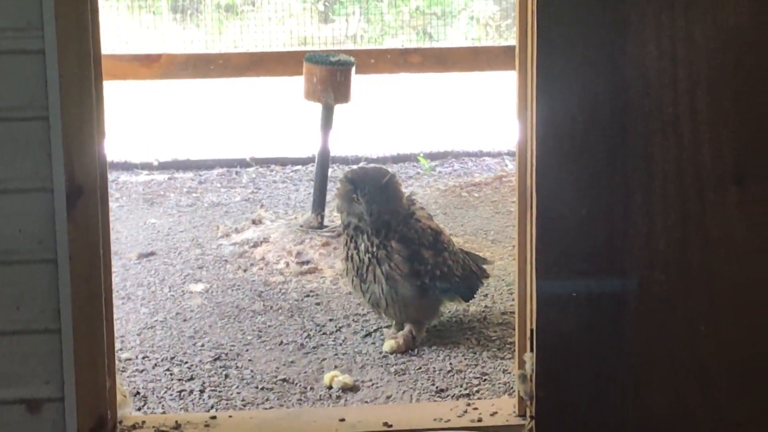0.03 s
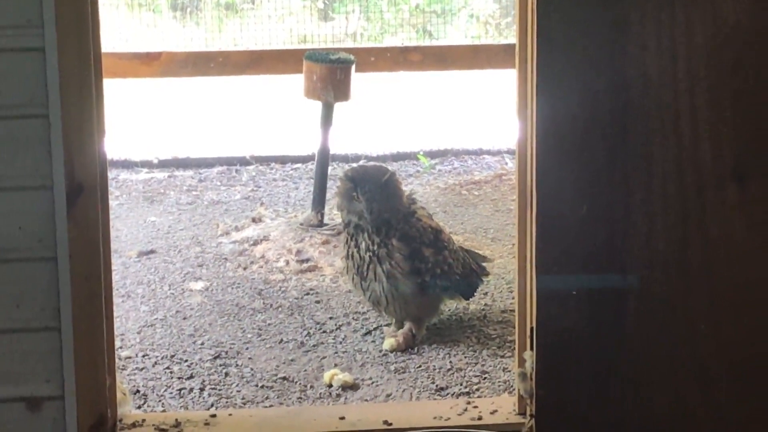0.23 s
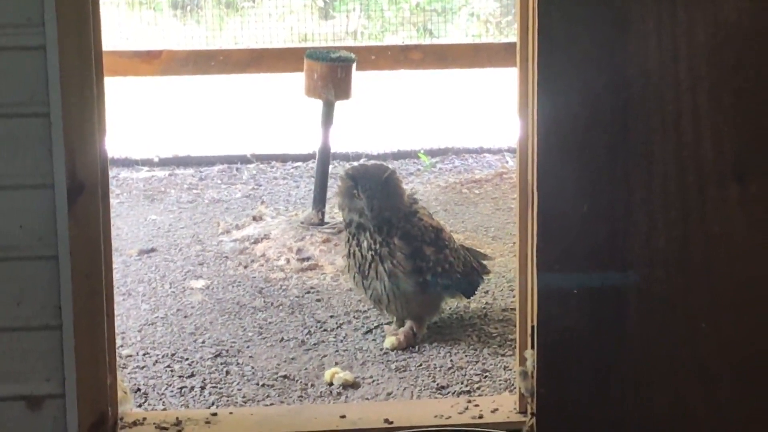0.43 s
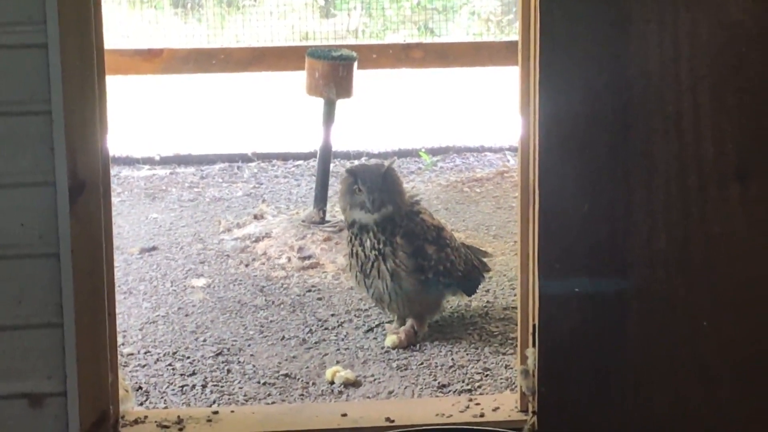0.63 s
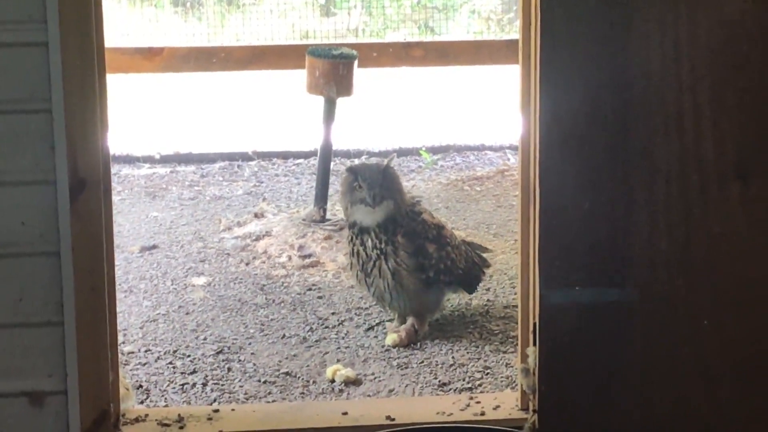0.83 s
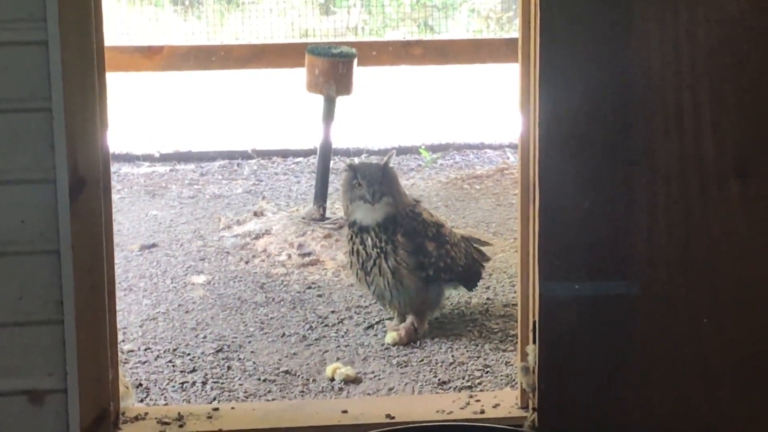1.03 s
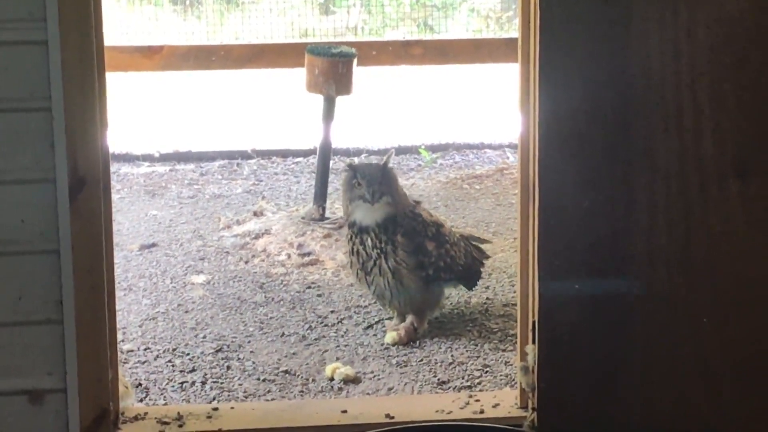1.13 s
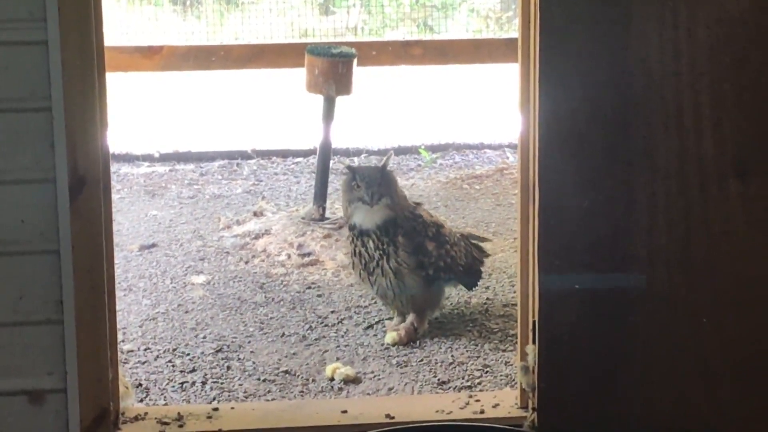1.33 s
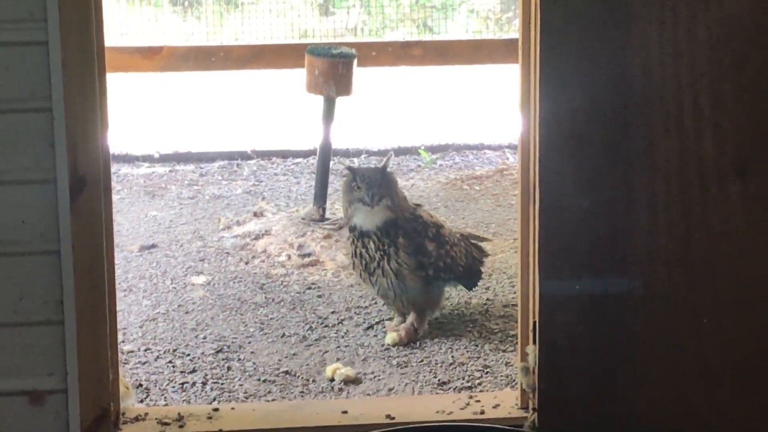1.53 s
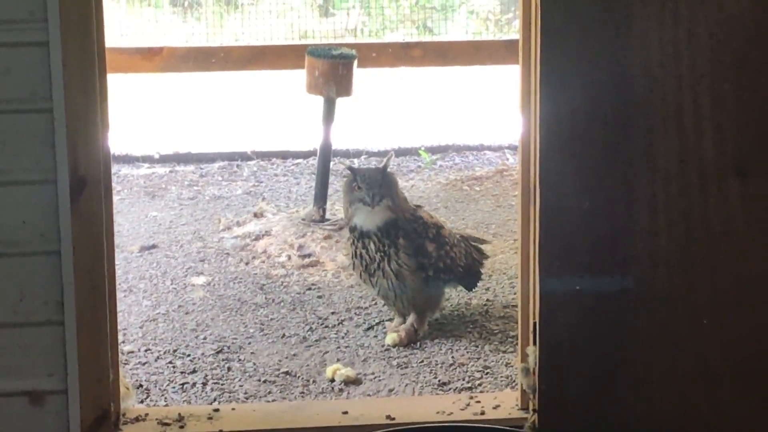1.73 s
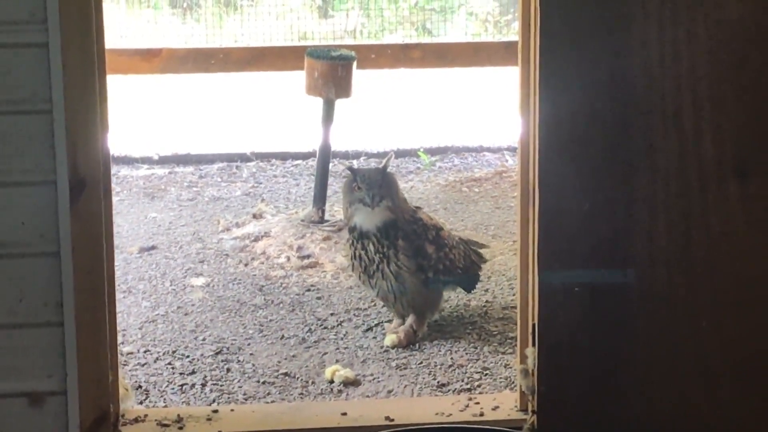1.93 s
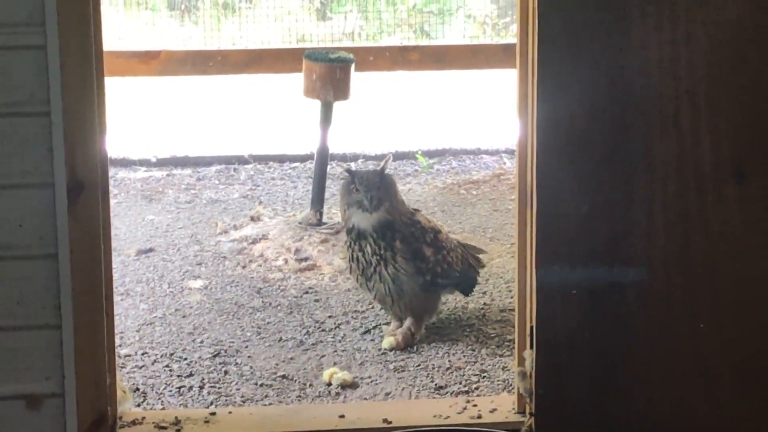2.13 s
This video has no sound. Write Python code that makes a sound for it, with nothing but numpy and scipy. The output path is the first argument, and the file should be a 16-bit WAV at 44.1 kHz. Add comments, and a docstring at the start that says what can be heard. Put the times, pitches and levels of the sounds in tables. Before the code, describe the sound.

A large owl gives one deep, hollow hoot that sags in pitch inside a wooden barn

```python
"""A motor hums over air and microphone hiss: wavering sine lines on coloured noise.
Small birds twitter far outside, early on and again around the hoot: short gliding whistles.
An eagle owl hoots once from the doorway of a wooden barn: clean partials on a pitch that jumps up and sags,
then breaks into a breathy creak. Echoes swell and thin the partials as the pitch slides through them."""
import sys
import numpy as np
from scipy import signal
from scipy.fft import rfft, irfft
from scipy.io import wavfile
from scipy.ndimage import uniform_filter1d

SR = 44100
rng = np.random.default_rng(int(sys.argv[2]) if len(sys.argv) > 2 else 0)


def store_wav(level_fs):
    """Save 16-bit WAV to argv[1]."""
    pcm = np.round(np.clip(np.atleast_2d(level_fs), -1, 1) * 32767)
    wavfile.write(sys.argv[1], SR, pcm.T.astype(np.int16))


def gain_from_db(level_db):
    """Convert decibel levels to linear amplitude factors (20 dB per decade)."""
    decades = np.asarray(level_db, float) / 20
    return 10 ** decades


N = 95564

# motor hum lines: f/Hz, mean level/dB rms
HUM_LINES = [(59.2, -63), (118.4, -78.5), (177.6, -73)]
HUM_WAVER_DB, HUM_WAVER_HZ = 0.73, 2.8

# spectrum of air and hiss: f/Hz, relative density/dB
FLOOR_SPECTRUM = [(25, -27), (42, 0.5), (75, 2), (100, -7), (140, -5.5), (300, -5.5), (700, -8.5),
                  (1000, -13), (2000, -18), (3500, -17.5), (5000, -21.5), (6500, -22.5), (7600, -28.5),
                  (9000, -27), (10500, -31.5), (11500, -28), (15600, -30)]
FLOOR_DB, PATCH_DB = -66, 1.38
SWELL_DB, SWELL_HZ = -0.06, 4.7

# far bird notes: start t/s, length t/s, start f/Hz, end f/Hz, level before flutter/dB
BIRD_NOTES = [(.275, 0.056, 2950, 3005, -78.5), (.315, 0.035, 3650, 3400, -88),
              (.335, .025, 2940, 3330, -75), (.365, .03, 3720, 3750, -82), (.37, 0.027, 2780, 2500, -81),
              (.395, 0.052, 3850, 3910, -83), (.455, 0.027, 3860, 3860, -84), (.51, .03, 3900, 4080, -85),
              (1.285, 0.045, 5740, 6230, -83.5), (1.635, 0.048, 3150, 3210, -79),
              (1.675, 0.029, 3807, 4040, -77), (1.70, 0.066, 4302, 4280, -78.5),
              (1.70, 0.09, 3246, 3236, -76), (1.775, 0.022, 2580, 2500, -75.5),
              (1.785, 0.029, 2993, 3220, -72), (1.83, 0.049, 3330, 2990, -77),
              (1.835, 0.04, 2500, 2853, -81), (1.86, .045, 3300, 3530, -78.5),
              (1.875, .03, 3020, 2694, -81), (1.95, 0.024, 3180, 3145, -85)]
# bursts of quick chirps: start t/s, length t/s, lowest start f/Hz, highest start f/Hz, level before flutter/dB
CHATTER_BURSTS = [(0.332, .15, 2633, 3686, -85.5), (1.768, .14, 2500, 3686, -85)]
CHIRPS_PER_BURST, CHIRP_S, CHIRP_GLIDE = 28, 0.014, 0.15  # glide: largest fraction of start pitch
FLUTTER, FLUTTER_HZ = 0.6, 110  # flutter: rms fraction of amplitude
WOODS_DB, WOODS_T60_S = -1, 0.4

# the hoot: t/s, pitch f/Hz, effort level/dB
HOOT_CURVE = [(1.2, 241.3, -78.5), (1.226, 266.5, -56.5), (1.245, 291.3, -43.5), (1.263, 312.5, -45),
              (1.284, 323.7, -35), (1.304, 333.2, -55), (1.33, 319.6, -40.5), (1.369, 300.1, -36),
              (1.42, 299.3, -43), (1.47, 288.7, -43.5), (1.519, 266.2, -44), (1.58, 261.9, -44.5),
              (1.649, 242, -53), (1.719, 234.7, -51.5), (1.78, 217.8, -53.5), (1.82, 201.3, -57),
              (1.848, 181, -73)]
# partials of the syrinx: multiple of pitch, level re effort/dB
SYRINX_PARTIALS = [(1, 1), (2, -7), (3, -11), (4, -9), (5, -11), (6, -22), (7, -26.5), (8, -27.5)]
# swollen throat's colour on the tone: f/Hz, gain/dB
SAC_GAIN = [(200, 4), (300, -4.5), (450, 3.5), (600, 11), (750, -6), (900, -12), (970, -16), (1150, -24),
            (1600, -18.5), (2400, -22)]
JITTER, JITTER_HZ = 0.001, 40  # jitter: rms fraction of pitch
# fast wavering of partial strength (rms fraction), worst as the tone starts
SHIMMER, ONSET_SHIMMER, SHIMMER_HZ, SETTLE_S = 0.04, 0.55, 80, 0.05
AIR_DB = -38  # breath riding on the tone, re effort
# extra puffs of breath: start t/s, length t/s, level/dB
BREATH_PUFFS = [(1.218, 0.041, -58.5), (1.835, .11, -60.5)]
# colour of breath in the throat: f/Hz, relative density/dB
THROAT_SPECTRUM = [(59, -30), (100, -5.5), (304, -6), (356, 0.5), (422, -3), (1040, -20.5), (1290, -41),
                   (1500, -30.5), (1950, -68.5), (3300, -120)]
# closing creak: start t/s, length t/s, start f/Hz, end f/Hz, level/dB
CREAK_GLIDE = (1.855, .105, 148, 136, -62)
CREAK_JITTER, CREAK_JITTER_HZ = 0.03, 70  # jitter: rms fraction of pitch
CREAK_PARTIALS, CREAK_TILT = 5, 0.5  # partial k has amplitude k ** -tilt

# echoes from floor, door frame and walls: delay t/ms, level/dB, sign
BARN_ECHOES = [(2.6, -14.5, 1), (5.105, -14, -1), (6.93, -16.5, 1), (9.69, -11.5, 1), (12.47, -8, 1),
               (14.54, -22.5, -1), (17.88, -14, 1), (19.585, -7.5, 1), (24.92, -16.5, -1), (26.826, -10, 1),
               (29.13, -23.5, -1), (31.435, -15, -1), (33.61, -13, 1), (35.92, -17.5, 1), (37.69, -16, -1),
               (43.7, -21.5, 1), (67.66, -15, 1), (95.33, -13, 1)]
DIRECT_DB = 0.5
TAIL_DB, TAIL_T60_S, TAIL_TOP_HZ = -6.5, 0.61, 2500


def evened(x):
    """Scales to rms 1."""
    return x / np.sqrt(np.mean(x ** 2) + 1e-20)


def add(mix, start_s, sound):
    """Mixes a sound in at a time, cut at the end of the mix."""
    part = mix[round(start_s * SR):][:len(sound)]
    part += sound[:len(part)]


def coloured(spectrum):
    """Noise of rms 1 with a spectrum interpolated on a log-frequency axis."""
    hz = np.fft.rfftfreq(N, 1 / SR)
    point_hz, point_db = np.transpose(spectrum)
    gain = gain_from_db(np.interp(np.log(hz + 1), np.log(point_hz), point_db, left=-80))
    return evened(irfft(rfft(rng.standard_normal(N)) * gain, N))


def drift(rate_hz):
    """Slow chance of rms 1: noise under a Gaussian low-pass, without its mean."""
    hz = np.fft.rfftfreq(N, 1 / SR)
    lowpass = np.exp(-(hz / rate_hz) ** 2) * (hz > 0)
    return evened(irfft(rfft(rng.standard_normal(N)) * lowpass, N))


def tail(x, t60_s):
    """Diffuse echoes: dense random taps dying away, energy 1."""
    t = np.arange(SR) / SR
    build_up = np.minimum(t / 0.0071, 1)
    taps = rng.standard_normal(SR) * gain_from_db(-60 * t / t60_s) * build_up
    return signal.fftconvolve(x, taps / np.linalg.norm(taps))[:N]


def swell(t, start_s, length_s):
    """One quick rise and slower fall."""
    return np.sin(np.pi * np.clip((t - start_s) / length_s, 0, 1) ** 0.38)


def hum():
    """Motor hum: sine lines, each wavering in level."""
    t = np.arange(N) / SR
    out = np.zeros(N)
    for hz, db in HUM_LINES:
        level = np.sqrt(2) * gain_from_db(db + HUM_WAVER_DB * drift(HUM_WAVER_HZ))
        out += level * np.sin(2 * np.pi * (hz * t + rng.random()))
    return out


def background():
    """Air and hiss: coloured noise with faint time-frequency patches and a slow swell."""
    z = signal.stft(coloured(FLOOR_SPECTRUM), nperseg=1024)[2]
    patches = uniform_filter1d(rng.standard_normal(z.shape), 10, axis=0)
    patches = evened(uniform_filter1d(patches, 8, axis=1))
    noise = signal.istft(z * gain_from_db(PATCH_DB * patches), nperseg=1024)[1][:N]
    return evened(noise) * gain_from_db(FLOOR_DB + SWELL_DB * drift(SWELL_HZ))


def chatter_notes():
    """Random chirps in each burst: chance time, pitch and glide up or down."""
    notes = []
    for start_s, length_s, low_hz, high_hz, db in CHATTER_BURSTS:
        for when, place, glide in rng.random((CHIRPS_PER_BURST, 3)):
            from_hz = low_hz + (high_hz - low_hz) * place
            to_hz = from_hz * (1 + CHIRP_GLIDE * (2 * glide - 1))
            notes.append((start_s + length_s * when, CHIRP_S, from_hz, to_hz, db))
    return notes


def birds():
    """Gliding sine whistles with a common flutter, smeared by echoes among the trees."""
    out = np.zeros(N)
    for start_s, length_s, from_hz, to_hz, db in list(BIRD_NOTES) + chatter_notes():
        u = np.linspace(0, 1, round(length_s * SR))
        whistle = np.sin(2 * np.pi * np.cumsum(from_hz + (to_hz - from_hz) * u) / SR)
        envelope = np.minimum(1, 4 * np.sin(np.pi * u))
        add(out, start_s, np.sqrt(2) * gain_from_db(db) * envelope * whistle)
    out *= 1 + FLUTTER * drift(FLUTTER_HZ)
    return out + gain_from_db(WOODS_DB) * tail(out, WOODS_T60_S)


def hoot_tone(t, pitch_hz):
    """Syrinx partials on one jittered phase, weighted by the throat at their moving pitch."""
    sac_hz, sac_db = np.transpose(SAC_GAIN)
    turns = np.cumsum(pitch_hz * (1 + JITTER * drift(JITTER_HZ))) / SR
    since_onset_s = np.maximum(t - HOOT_CURVE[0][0], 0)
    waver = SHIMMER + ONSET_SHIMMER * np.exp(-since_onset_s / SETTLE_S)
    tone = np.zeros(N)
    for k, db in SYRINX_PARTIALS:
        throat_db = np.interp(np.log(k * pitch_hz), np.log(sac_hz), sac_db)
        strength = np.sqrt(2) * gain_from_db(db + throat_db) * (1 + waver * drift(SHIMMER_HZ))
        tone += strength * np.cos(2 * np.pi * k * turns)
    return tone


def breath(t, effort):
    """Throat-coloured noise that follows the effort, plus separate puffs."""
    level = effort * gain_from_db(AIR_DB)
    for start_s, length_s, db in BREATH_PUFFS:
        level = level + gain_from_db(db) * swell(t, start_s, length_s)
    return level * coloured(THROAT_SPECTRUM)


def creak(t):
    """The breaking voice: a low harmonic tone with rough pitch."""
    start_s, length_s, from_hz, to_hz, db = CREAK_GLIDE
    glide_hz = np.interp(t, [start_s, start_s + length_s], [from_hz, to_hz])
    turns = np.cumsum(glide_hz * (1 + CREAK_JITTER * drift(CREAK_JITTER_HZ))) / SR
    voice = sum(np.cos(2 * np.pi * k * turns) / k ** CREAK_TILT for k in range(1, CREAK_PARTIALS + 1))
    return gain_from_db(db) * swell(t, start_s, length_s) * evened(voice)


def owl():
    """The hoot: tone driven by effort, breath on and around it, and a closing creak."""
    t = np.arange(N) / SR
    curve_s, curve_hz, curve_db = np.transpose(HOOT_CURVE)
    pitch_hz = uniform_filter1d(np.interp(t, curve_s, curve_hz), size=400)
    effort = gain_from_db(np.interp(t, curve_s, curve_db, left=-120, right=-120))
    effort = uniform_filter1d(effort, size=300)
    return effort * hoot_tone(t, pitch_hz) + breath(t, effort) + creak(t)


def barn(x):
    """Direct sound and single echoes as delays in phase, plus a dull diffuse tail."""
    hz = np.fft.rfftfreq(N, 1 / SR)
    response = gain_from_db(DIRECT_DB)
    for delay_ms, db, sign in BARN_ECHOES:
        response = response + sign * gain_from_db(db) * np.exp(-2j * np.pi * hz * delay_ms / 1000)
    dull = signal.lfilter(*signal.butter(1, TAIL_TOP_HZ, fs=SR), tail(x, TAIL_T60_S))
    return irfft(rfft(x) * response, N) + gain_from_db(TAIL_DB) * dull


def scene():
    """Hum, air and birds, with the owl in the barn; one channel."""
    return (hum() + background() + birds() + barn(owl()))[None]


def top_cut(x):
    """Nothing passes above the cut-off."""
    return signal.sosfilt(signal.butter(12, 15660, fs=SR, output="sos"), x)


def record(dry):
    """Takes the finished mix to the output."""
    return top_cut(dry)


dry = scene()
out = record(dry)
store_wav(out)
```